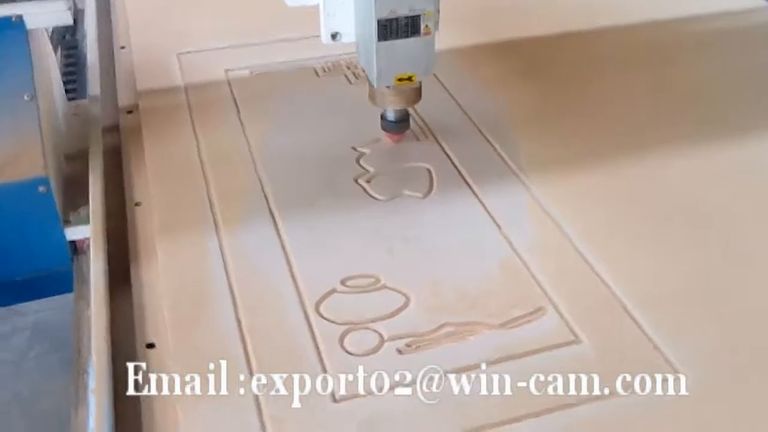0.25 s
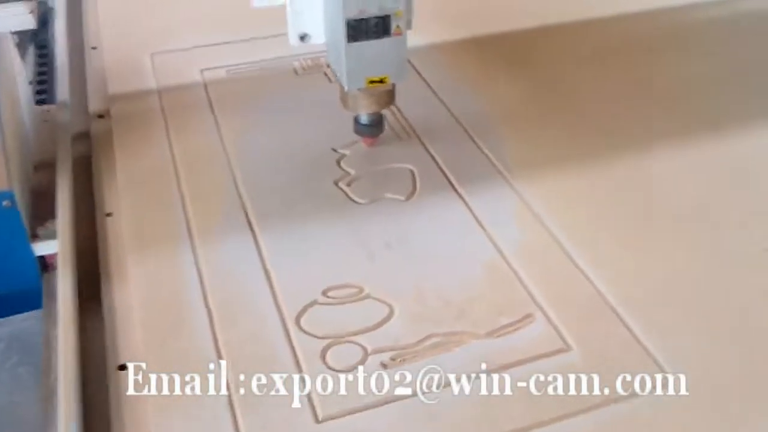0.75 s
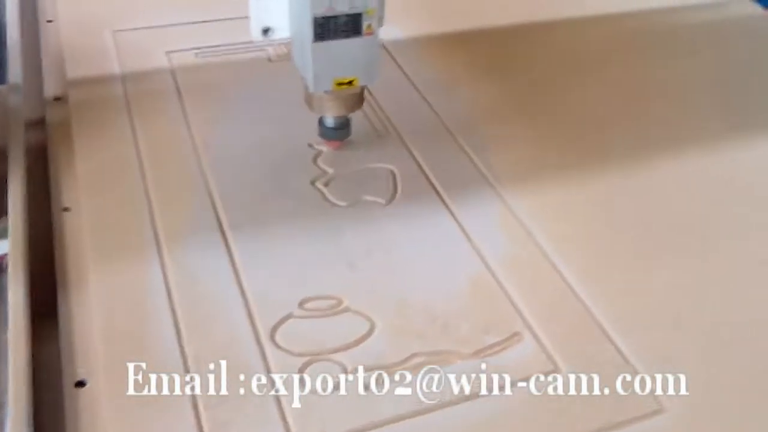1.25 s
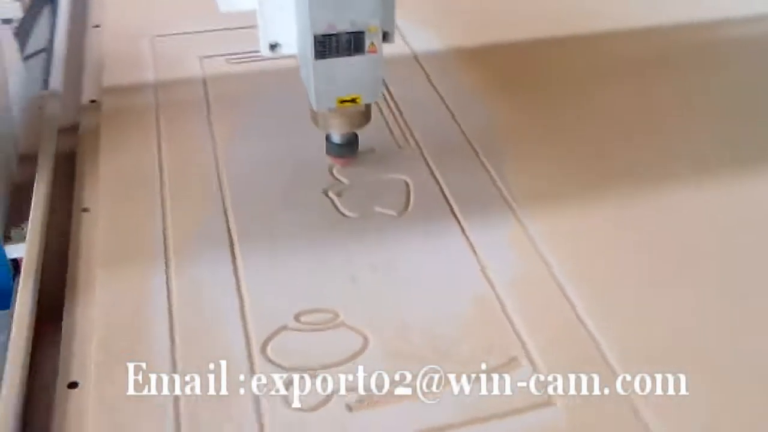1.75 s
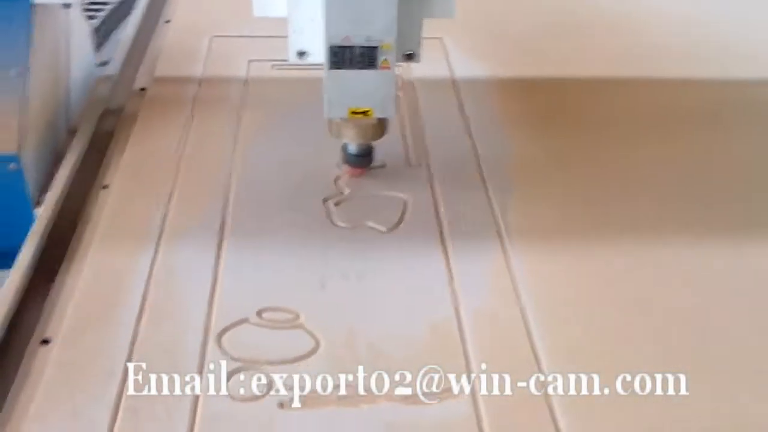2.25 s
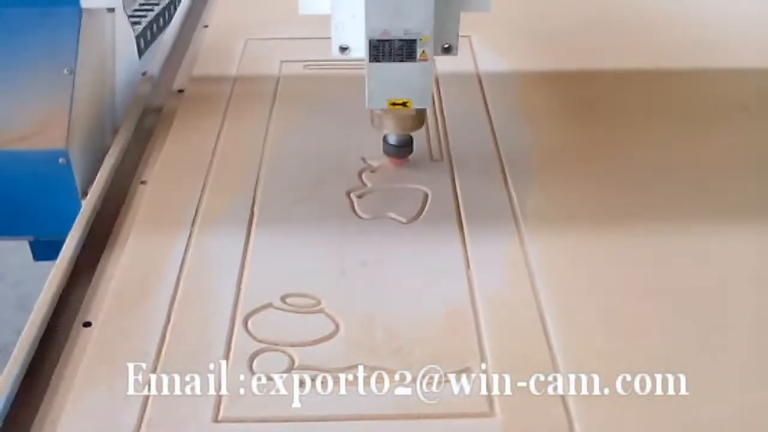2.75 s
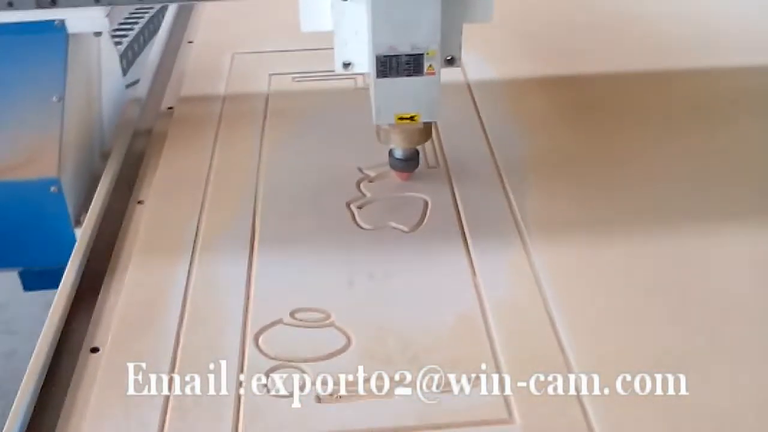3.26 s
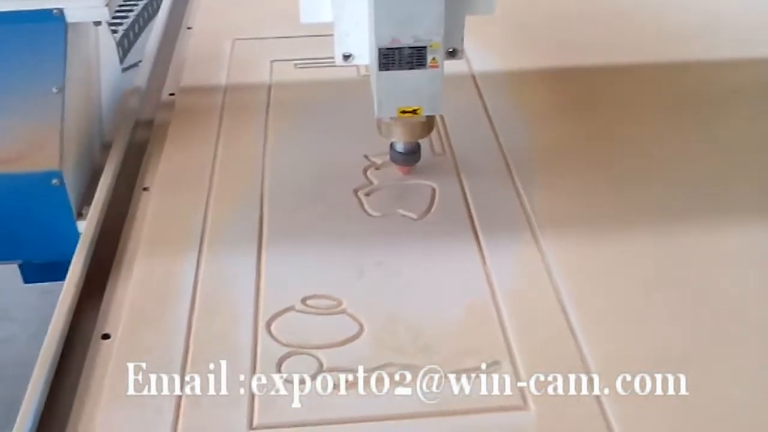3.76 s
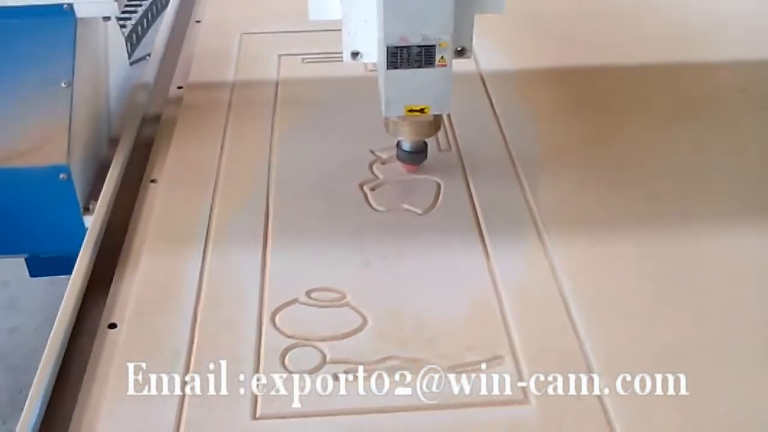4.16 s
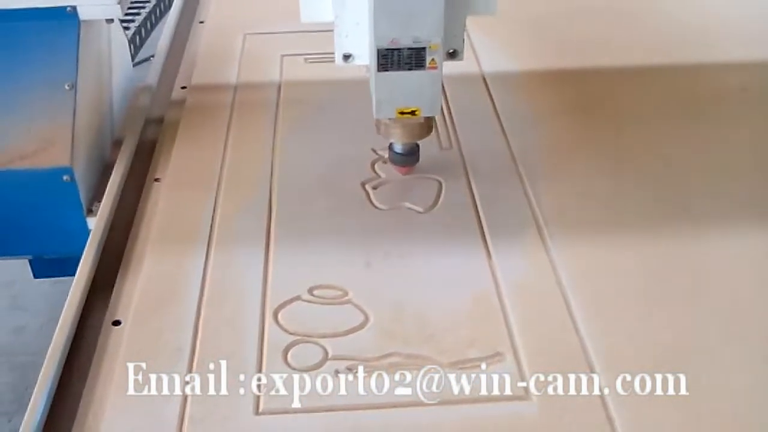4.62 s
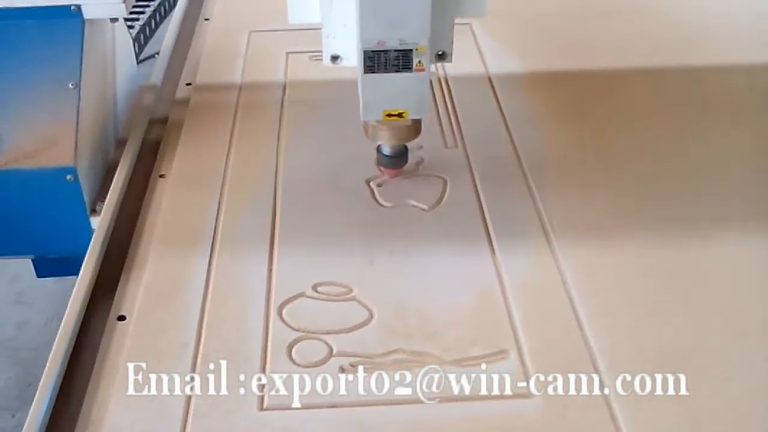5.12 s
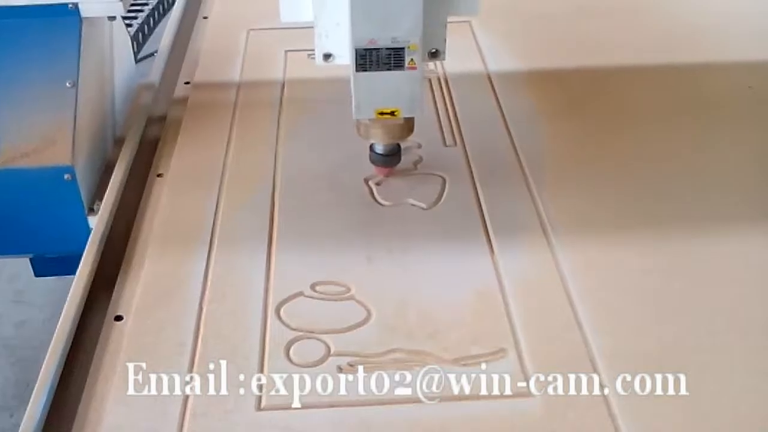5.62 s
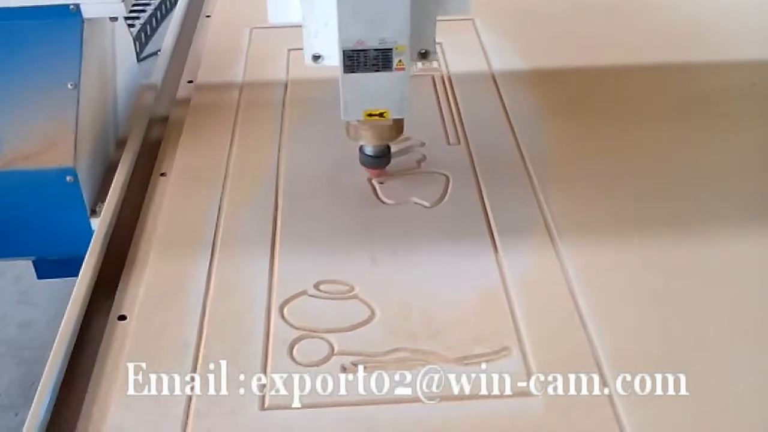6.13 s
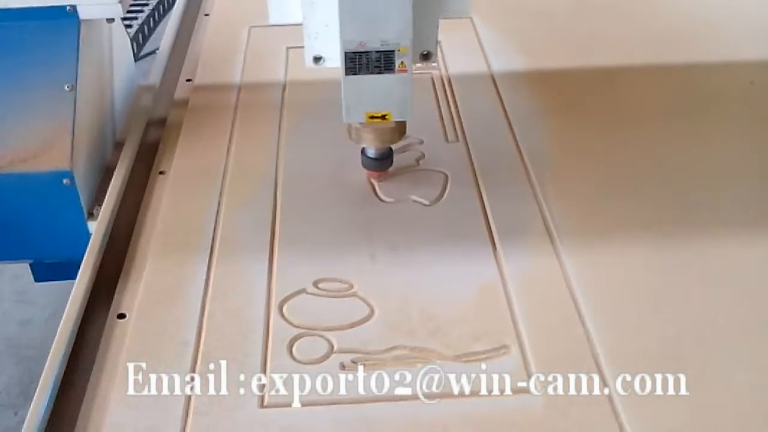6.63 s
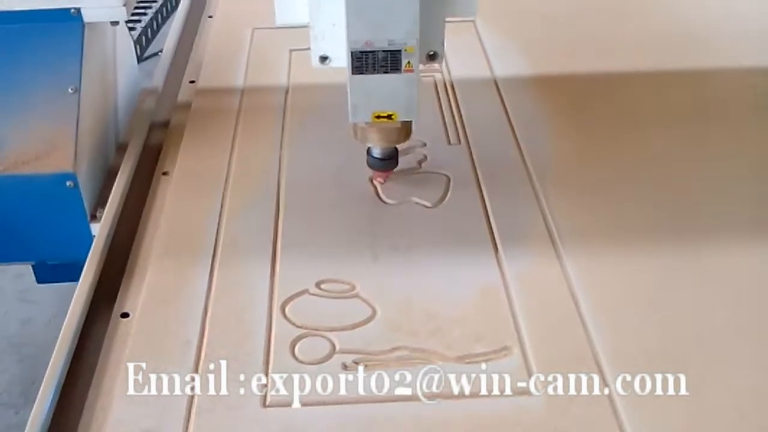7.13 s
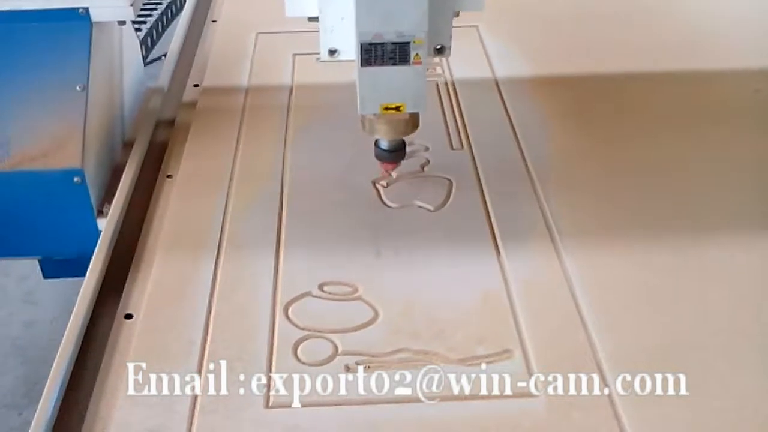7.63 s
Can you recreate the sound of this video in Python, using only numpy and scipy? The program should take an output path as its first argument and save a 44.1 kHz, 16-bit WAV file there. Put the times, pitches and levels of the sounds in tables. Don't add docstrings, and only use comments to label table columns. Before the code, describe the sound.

Router bit carving grooves in fibre board, already running and never stopping. A dense buzzing hum near 300 Hz carries rough, shifting upper whines, with steady coarse hiss and fine air above. The hum is strongest in the middle, then dips several times. Close, wide, slightly overloaded phone sound, with faint workshop rumble and a distant engine drone at the end.

```python
import sys
import numpy as np
from scipy import signal
from scipy.fft import rfft, irfft, next_fast_len
from scipy.io import wavfile
from scipy.ndimage import uniform_filter1d

SR = 44100
rng = np.random.default_rng(int(sys.argv[2]) if len(sys.argv) > 2 else 0)


def attenuation_scalar(level_db):
    decades = np.asarray(level_db, float) / 20
    return 10 ** decades


def wav_record(signal):
    frames = np.transpose(np.atleast_2d(signal))
    bounded = np.clip(frames, -1, 1)
    quanta = np.round(bounded * 32767).astype(np.int16)
    wavfile.write(sys.argv[1], SR, quanta)


N = 347497
TIME = np.arange(N) / SR
SLOW = np.arange(0, N + 32, 32) / SR
SHAFT_HZ = 299.53


def fine(slow):
    return np.interp(TIME, SLOW, slow)


def walk(rate_hz):
    hold = max(int(1 / (rate_hz * SLOW[1])), 1)
    held = np.repeat(rng.standard_normal(len(SLOW)), hold)[:len(SLOW)]
    slewed = uniform_filter1d(uniform_filter1d(held, hold), hold)
    return slewed / slewed.std()


def on_log(points, hz, **ends):
    point_hz, values = np.transpose(points)
    return np.interp(np.log(hz + 1), np.log(point_hz), values, **ends)


def swells(rows, rest_db):
    edge_s, waver_db, waver_hz = 0.047, 0.8, 8.0

    def rise(start_s):
        return 0.5 + 0.5 * np.tanh(2 * (SLOW - start_s) / edge_s)

    power = attenuation_scalar(rest_db) ** 2
    for start_s, length_s, db in rows:
        power = power + attenuation_scalar(db) ** 2 * rise(start_s) * (1 - rise(start_s + length_s))
    return 10 * np.log10(power) + waver_db * walk(waver_hz)


def tone(hz, db, pan_db, lead_rad=0., rough=0., rough_hz=40.24):
    shake = 1 + rough * (walk(rough_hz) + 1j * walk(rough_hz)) / np.sqrt(2)
    left = attenuation_scalar(pan_db / 2) * np.exp(1j * lead_rad)
    right = attenuation_scalar(-pan_db / 2)
    size = np.sqrt(2) * attenuation_scalar(db) * shake / np.maximum(abs(left + right) / 2, 0.7)
    carrier = np.exp(2j * np.pi * (hz * TIME + rng.random()))
    return np.array([(fine(size * port) * carrier).real for port in (left, right)])


def hiss(mid_points, side_points, side_db, flicker_db, band_hz, repeat=0., low_db=0.):
    # frequency in Hz, likeness from -1 to 1 (+ leans left).
    lean_points = [(100, 0.16), (1000, 0.15), (3300, 0.09), (4200, -0.59), (5400, -0.43), (6500, 0.35),
                   (9000, 0.72), (11000, 0.88), (15000, 0.75)]
    size = next_fast_len(N)
    hz = np.fft.rfftfreq(size, 1 / SR)
    a, b = rfft(rng.standard_normal((2, size)))
    lean = np.clip(on_log(lean_points, hz), -1, 1)
    comb = abs(1 - repeat * np.exp(2j * np.pi * hz / SHAFT_HZ))
    mid_gain = attenuation_scalar(on_log(mid_points, hz, left=-90, right=-90)) / comb
    side_gain = attenuation_scalar(on_log(side_points, hz, left=-90, right=-88) + side_db) / comb
    both = np.array([a * mid_gain, (lean * a + np.sqrt(1 - lean ** 2) * b) * side_gain])
    in_band = (hz > band_hz[0]) & (hz < band_hz[1])
    both /= np.sqrt(2 * np.sum(mid_gain[in_band] ** 2) / size)

    edges_hz = np.geomspace(mid_points[0][0], mid_points[-1][0], num=5)[1:-1]
    band = np.searchsorted(edges_hz, hz)
    mid_side = 0
    for k, low_share in enumerate((0.0029, 0.17, 0.16, 0)):
        flicker = fine(attenuation_scalar(flicker_db * walk(7.4) + low_db * low_share))
        mid_side = mid_side + irfft(both * (band == k), size)[:, :N] * flicker
    mid, side = mid_side
    return np.array([mid + side, mid - side])


def hum_level():
    # time in seconds, level in dB.
    travel = [(0.0, -16.5), (0.42, -13), (0.68, -13), (0.8, -10), (1.49, -9), (1.78, -9.5), (2.06, -16),
              (3.01, -12.5), (3.36, -12.5), (3.6, -9.5), (4.39, -11.5), (4.61, -8.5), (5.36, -8),
              (5.96, -9.5), (6.32, -15), (6.58, -9.5), (7.32, -21), (7.88, -16)]
    # time in seconds, half width in seconds, depth in dB.
    nodes = [
        (5.75, 0.18, -30),
        (6.96, 0.096, -21),
        (7.56, 0.2, -13),
    ]
    db = np.interp(SLOW, *np.transpose(travel))
    for s, half_width_s, depth_db in nodes:
        db = db + 10 * np.log10(np.tanh((SLOW - s) / half_width_s) ** 2 + attenuation_scalar(depth_db) ** 2)
    return db


def overtone_levels():
    # start in seconds, length in seconds, level in dB.
    board = [
        [(0.0, 0.48, -27.5), (0.8, 0.99, -26), (2.07, 0.49, -19), (2.55, 0.48, -23.5), (3.3, 1.0, -26.5),
         (5.45, 0.3, -27.5), (5.8, 0.75, -21), (6.7, 0.4, -26.5), (7.35, 0.19, -29.5), (7.7, 0.2, -28.5),
         (4.5, 0.39, -29.5)],
        [(0.0, 0.66, -28.5), (0.95, 0.62, -31), (1.65, 0.3, -29.5), (3.3, 0.88, -35.5), (5.75, 0.7, -31.5),
         (6.55, 0.29, -31), (7.2, 0.37, -40)],
    ]
    runout = [
        [(0.0, 0.46, -30), (2.15, 0.6, -33.5), (2.83, 0.41, -31), (4.28, 0.2, -32.5), (5.58, 0.35, -33),
         (6.72, 0.42, -31)],
        [(0.2, 0.33, -32), (0.77, 0.93, -30.5), (2.38, 0.36, -33), (2.88, 0.25, -31), (5.7, 0.23, -35),
         (6.07, 0.28, -28), (6.8, 0.85, -33)],
        [(0.0, 0.5, -28), (0.9, 1.1, -29), (2.85, 0.19, -28), (4.08, 0.45, -25.5), (5.75, 0.2, -31),
         (6.57, 0.24, -22.5)],
    ]
    flutes = [
        [(0.0, 0.48, -26), (0.93, 0.25, -28.5), (2.02, 0.68, -26), (2.77, 0.15, -22.5), (3.3, 0.33, -24),
         (3.77, 0.2, -26.5), (4.08, 0.15, -28), (4.32, 0.16, -28), (4.7, 0.32, -32), (5.05, 0.28, -29),
         (5.46, 0.12, -31), (6.43, 0.081, -27), (6.84, 0.14, -28)],
        [(0.22, 0.19, -23.5), (0.52, 1.4, -22), (2.1, 1.2, -25.5), (3.63, 0.38, -24.5), (4.1, 0.29, -32),
         (5.65, 0.36, -30), (6.1, 0.5, -28)],
        [(0.08, 0.33, -22), (1.9, 0.76, -28), (4.08, 0.49, -25), (5.72, 0.2, -25), (6.08, 0.38, -17),
         (6.4, 0.4, -24), (6.92, 0.12, -20)],
        [(0.6, 1.7, -27), (3.0, 1.2, -32), (5.7, 0.6, -35)],
    ]
    slots = [
        [(0.05, 0.47, -20.5), (0.6, 0.16, -19.5), (0.55, 0.7, -21.5), (0.98, 0.19, -19), (1.25, 0.55, -26),
         (2.3, 0.28, -20), (1.8, 0.52, -17), (2.6, 0.36, -16), (3.0, 0.69, -17.5), (3.75, 1.75, -22.5),
         (4.1, 0.35, -23.5), (5.5, 0.34, -17.5), (5.95, 0.19, -20.5), (5.85, 1.45, -21.5), (6.2, 0.57, -23),
         (7.75, 0.2, -20)],
        [(0.15, 0.55, -26), (2.0, 0.9, -32), (3.9, 1.06, -36), (5.3, 1.4, -32.5), (6.8, 0.2, -23),
         (7.2, 0.6, -25)],
    ]
    rests_db = (-34, -40, -45, -38, -30.5, -34, -42, -32.5, -30, -29.5, -29)
    return [swells(rows, rest_db) for rows, rest_db in zip(board + runout + flutes + slots, rests_db)]


def spindle(hum_db):
    strong_orders = (1, 2, 3, 4, 5, 8, 6, 7, 9, 10, 12, 18)
    # trim in dB, roughness, left minus right in dB,
    # left lead in rad, sway in rad.
    strong = [(1, 0, -3, 0.033, 0.03), (-2, 0.02, -1, 0.31, .05), (1, 0.51, -0.5, 0.8, 0.87),
              (-1, 0.38, 2, 0.48, 0.28), (-3, 0.34, -5, 0.75, 0.29), (-3, 0.73, -5, -0.085, 0.29),
              (1.5, 0.27, 1, 1, 0.71), (-4, 0.66, -6.5, 0.73, 0.34), (-7.5, 0.5, 4, -0.04, 0.32),
              (-3.5, 1.4, 0, -0.44, 0.28), (-1, 0.25, 4.5, -.1, 0.13), (-0.5, 0.82, -2.5, -1.53, 0.37)]
    faint_orders = (11, 14, 19, 22, 30)
    # level in dB, left minus right in dB.
    faint = [(-52, 21), (-38, 1), (-46.5, 8), (-47.5, 18), (-49.5, 6)]
    # start in seconds, length in seconds, throb depth in dB.
    axis_run = [
        (3.3, 1.85, -18.5),
    ]

    throb_phase = 2 * np.pi * 27.4 * SLOW + 2.0 * walk(4.4)
    throb = 1 + fine(attenuation_scalar(swells(axis_run, rest_db=-21.5)) * np.cos(throb_phase))
    levels_db = [hum_db] + overtone_levels()
    out = 0
    for order, (trim_db, rough, pan_db, lead, sway), db in zip(strong_orders, strong, levels_db):
        lead_rad = lead + sway * np.tanh(walk(1.44))
        line = tone(order * SHAFT_HZ, db + trim_db, pan_db, lead_rad, rough, rough_hz=45. + 6. * order)
        out = out + (line * throb if order == 1 else line)
    for order, (db, pan_db) in zip(faint_orders, faint):
        out = out + tone(order * SHAFT_HZ, db + 3.8 * walk(2.46), pan_db, rough=1.67, rough_hz=70.)
    return out


def chips(duck_db):
    # frequency in Hz, density in dB per Hz.
    mid_points = [(280, 2), (340, -21), (420, -10.5), (560, -7.5), (700, -7), (1100, -10.5), (1600, -10),
                  (2300, -3), (3200, -4), (4000, 0.5), (5300, -3), (6000, -7.5), (6800, -15.5),
                  (7400, -20.5)]
    side_points = [(100, -52), (400, -16), (800, -25.5), (1500, -14.5), (2500, -10), (3500, -8.5),
                   (4600, 0), (5500, -3), (6700, -19), (7200, -11.5), (9000, -19.5)]
    drone_db = 1.5 - 0.62 * SLOW + 0.3 * duck_db + 1.2 * walk(5.2)
    noise = hiss(mid_points, side_points, side_db=2.1, flicker_db=-0.09, band_hz=(3700, 5300),
                 repeat=0.032, low_db=drone_db)
    return fine(attenuation_scalar(-16 + duck_db)) * noise


def cooling_air(duck_db):
    # frequency in Hz, density in dB per Hz.
    mid_points = [(6500, -45), (7200, -9), (8000, -8.5), (9000, -2.5), (10000, 2.5), (10800, 5),
                  (12500, 3.5), (14300, 4.5), (15700, -10)]
    side_points = [(4240, -10), (7200, -6), (9820, 0.5), (10800, 1), (13900, 2), (14600, 0), (15200, -11)]
    noise = hiss(mid_points, side_points, side_db=5.0, flicker_db=0.5, band_hz=(10500, 14500))
    return fine(attenuation_scalar(-24.5 + 0.93 * duck_db)) * noise


def echoes(direct, share, bins, frames):
    _, _, z = signal.stft(direct, nperseg=1024)
    chance = rng.standard_normal((2,) + z.shape[1:])
    chance = uniform_filter1d(uniform_filter1d(chance, bins, axis=1), frames, axis=2)
    gain = abs(1 + share * (chance[0] + 1j * chance[1]) / chance.std())
    _, mixed = signal.istft(z * gain / np.sqrt(1 + 2 * share ** 2), nperseg=1024)
    return mixed[:, :N]


def cutting(duck_db):
    turn_rad = 2 * np.pi * SHAFT_HZ * TIME
    puffs = 1 + 0.024 * np.cos(turn_rad) + 0.024 * np.cos(2 * turn_rad)
    return puffs * echoes(chips(duck_db) + cooling_air(duck_db), share=0.25, bins=2, frames=8)


def whistles():
    pitches_hz = (123, 4312, 9400, 10601, 11085, 14103)
    # level in dB, left minus right in dB.
    strengths = [(-39, 0), (-34, 9), (-56, 11), (-52, 11), (-55, 6), (-47, 13)]
    return sum(tone(hz, db + 0.64 * walk(2.1), pan_db, rough=0.59, rough_hz=29.92)
               for hz, (db, pan_db) in zip(pitches_hz, strengths))


def bearing_squeak():
    # start in seconds, length in seconds, level in dB.
    squeak = [
        (1.93, 0.13, -31),
    ]
    return tone(10970, swells(squeak, -72), 9.4, rough=1.5, rough_hz=300.)


def workshop_rumble(duck_db):
    # frequency in Hz, density in dB per Hz.
    rumble_points = [(15, -55), (25, -24), (54, -28.5), (118, -3.5), (156, -9), (189, -4.5), (221, -9),
                     (262, -4), (270, -30), (350, -8), (590, -120)]
    noise = hiss(rumble_points, rumble_points, side_db=-21.0, flicker_db=2.0, band_hz=(60, 220))
    return fine(attenuation_scalar(-27.5 + 2.1 * duck_db + 1.8 * walk(2.94) - 0.43 * SLOW)) * noise


def passing_truck():
    # start in seconds, length in seconds, level in dB.
    truck = [
        (7.1, 0.5, -43),
    ]
    return tone(73.5, swells(truck, -70), 0., rough=0.6, rough_hz=24.8)


def gain_duck(hum_db):
    knee_db, squeeze = -9, 0.79
    excess = uniform_filter1d(attenuation_scalar(hum_db - knee_db) ** 2, size=200)
    return -10 * squeeze * np.log10(1 + excess)


def scene():
    hum_db = hum_level()
    duck_db = gain_duck(hum_db)
    machine = spindle(hum_db) + cutting(duck_db) + whistles() + bearing_squeak()
    return machine + workshop_rumble(duck_db) + passing_truck()


def roll_off(x):
    return signal.sosfilt(signal.butter(12, 15500, fs=SR, output="sos"), x)


def record(dry):
    overloaded = np.clip(dry, -1, 1)
    return roll_off(overloaded)


dry = scene()
out = record(dry)
wav_record(out)
```